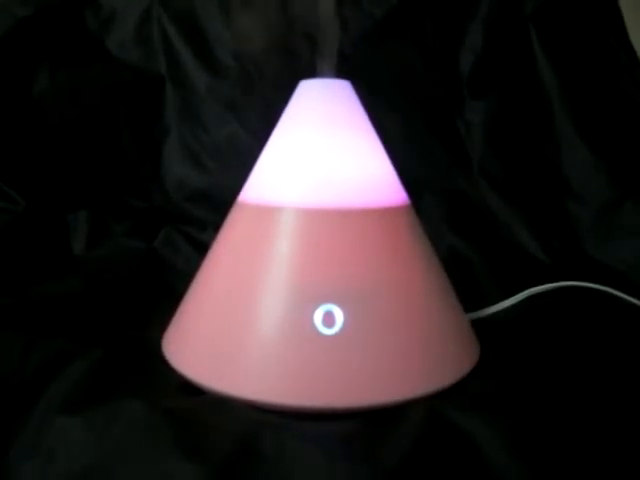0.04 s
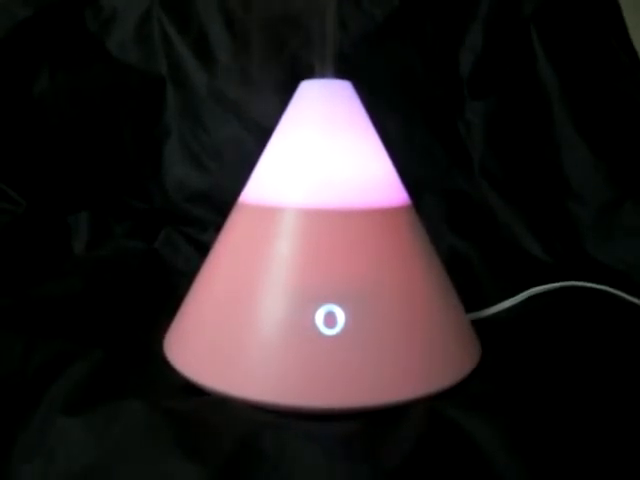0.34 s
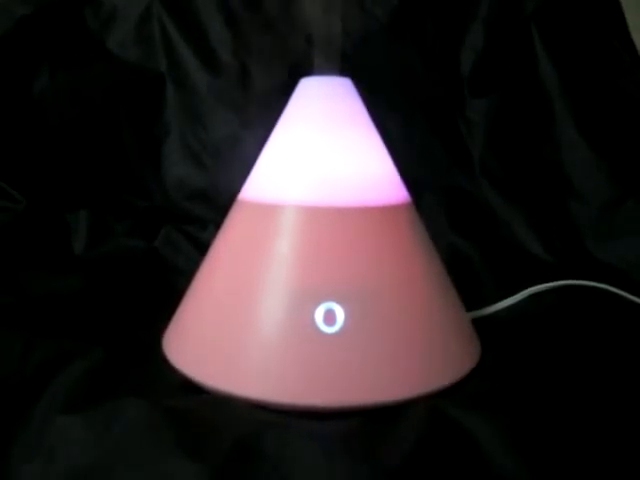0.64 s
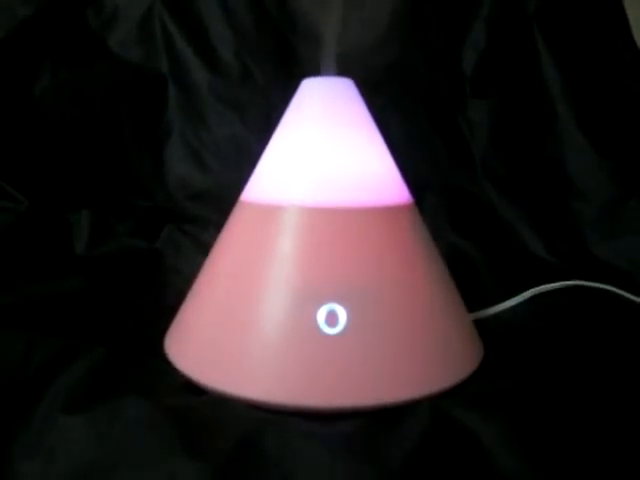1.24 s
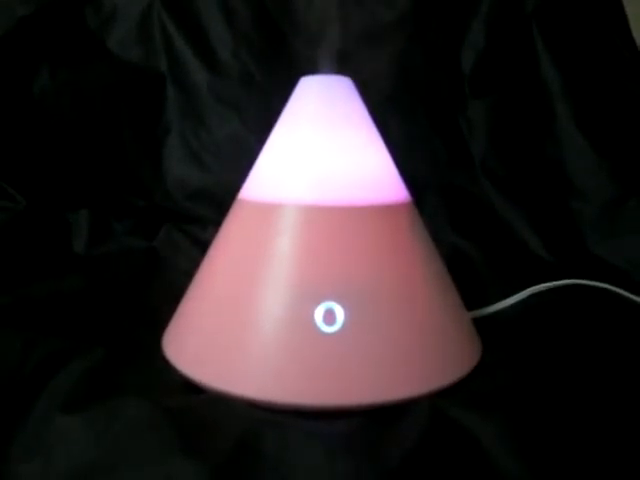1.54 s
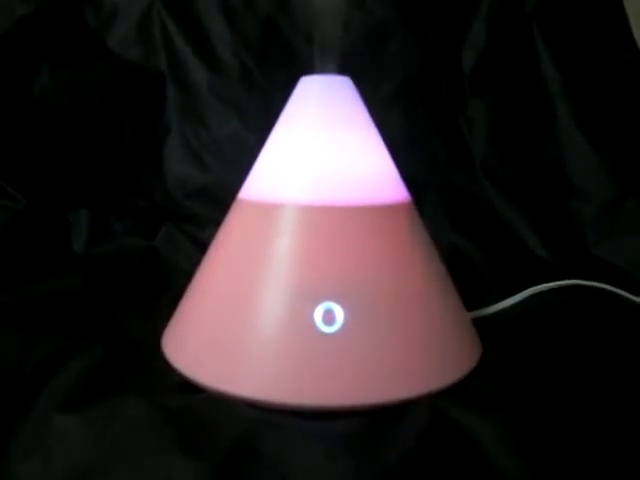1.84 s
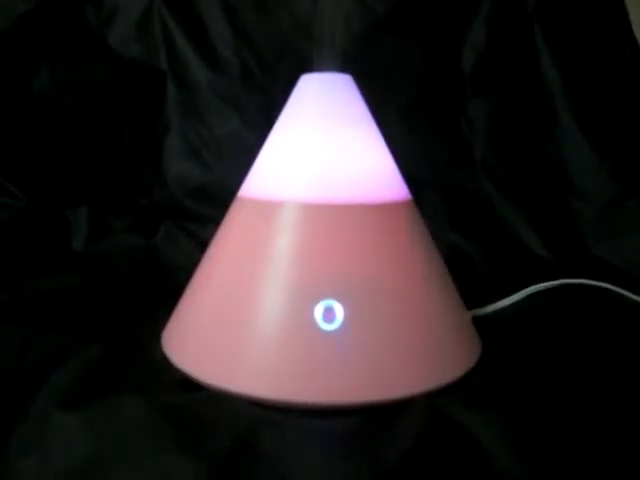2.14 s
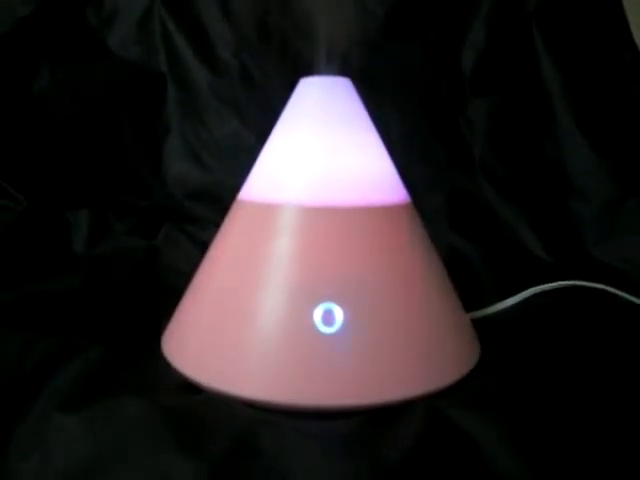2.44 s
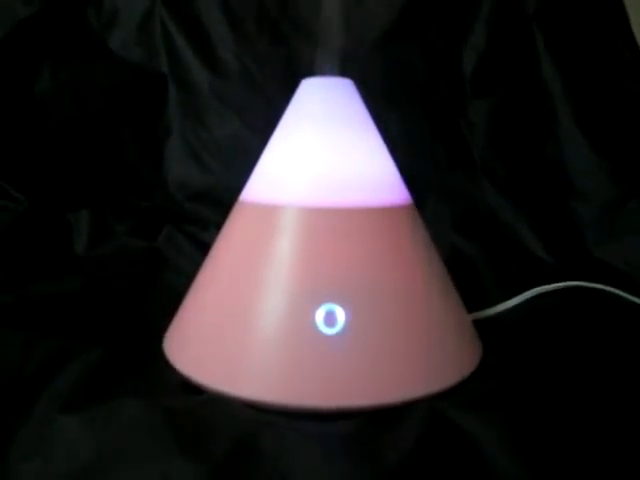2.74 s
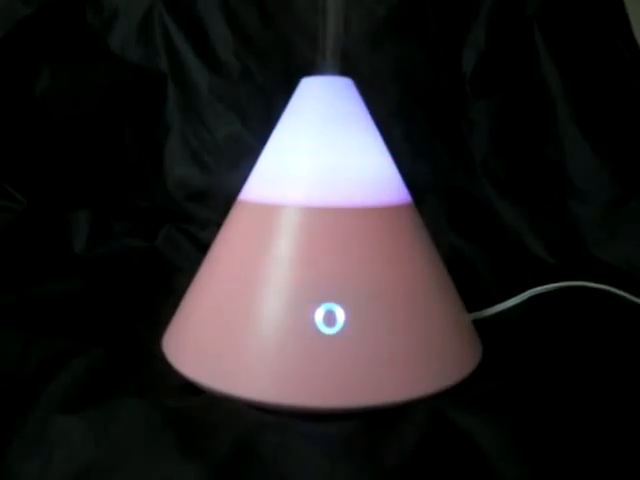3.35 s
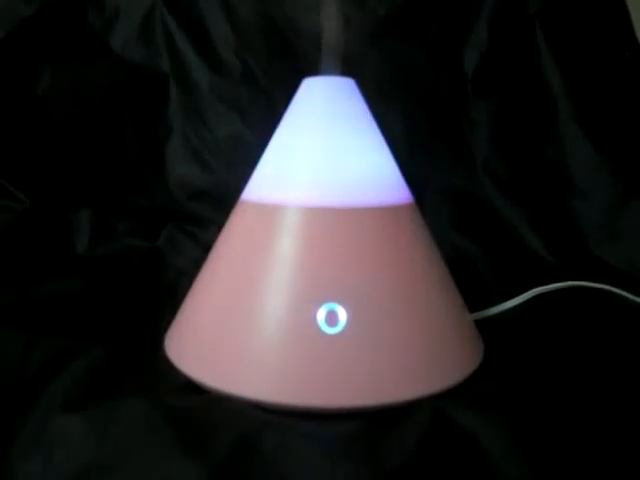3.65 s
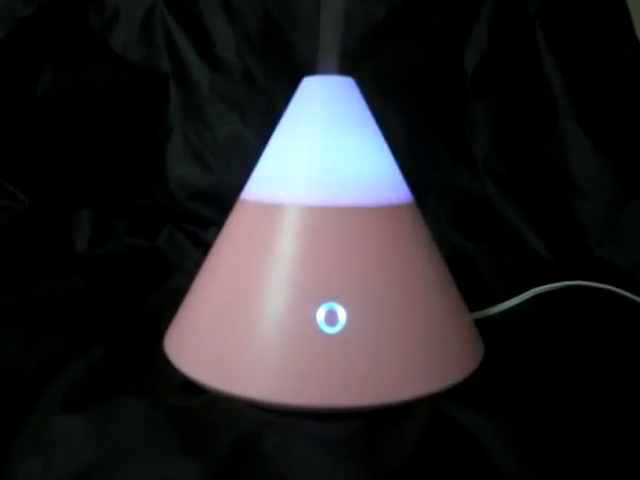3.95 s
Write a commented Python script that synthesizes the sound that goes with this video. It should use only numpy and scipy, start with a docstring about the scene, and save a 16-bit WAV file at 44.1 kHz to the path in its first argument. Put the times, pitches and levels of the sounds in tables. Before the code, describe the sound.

A muffled engine rumble, heard from inside a quiet room, wavers as a vehicle slowly nears outside. A faint high whistle frays into soft hiss, a tiny squeak follows, and tyre noise grows over a mist diffuser's slight hum.

```python
"""A vehicle's engine drones through the wall of a quiet room as it slowly draws near outside.
Periodic firing gives a low tone that fades in and out above a throb and a rumble; broadband
tyre noise swells and excites the window's resonances. Indoors, a mist diffuser's fan hums faintly.
At the start a thin high whistle sags and frays, and a soft hiss follows near the same pitch.
One faint squeak sounds about halfway through."""
import sys
import numpy as np
from scipy import signal
from scipy.fft import rfft, irfft
from scipy.io import wavfile

SR = 44100
rng = np.random.default_rng(int(sys.argv[2]) if len(sys.argv) > 2 else 0)


def bounce(signal):
    """Save signal as a 16-bit WAV file at the path given by the first command-line argument."""
    frames = np.transpose(np.atleast_2d(signal))
    limited = np.clip(frames, -1, 1)
    pcm = np.round(limited * 32767).astype(np.int16)
    wavfile.write(sys.argv[1], SR, pcm)


N = 176400


def from_db(db):
    """Amplitude ratio of a level: a factor of ten per 20 dB."""
    return 10 ** (np.asarray(db) / 20)


def rms_one(x):
    """Normalisation to unit mean power."""
    return x / np.sqrt(np.mean(x ** 2) + 1e-20)


def seconds():
    """Uniform sampling: the time of every sample."""
    return np.arange(N) / SR


def in_time(rows):
    """Linear interpolation between rows of t/s, value."""
    return np.interp(seconds(), *np.transpose(rows))


def drift(corner_hz):
    """Random modulation: noise through a two-pole low-pass, with a spread of about 1."""
    step, settling = 40, 2000  # samples per control point; points discarded as the filter settles
    pole = np.exp(-2 * np.pi * corner_hz * step / SR)
    white = rng.standard_normal(N // step + settling + 2)
    slow = signal.lfilter([1], [1, -2 * pole, pole * pole], white)[settling:]
    return np.interp(np.arange(N) / step, np.arange(len(slow)), rms_one(slow))


def coloured_noise(spectrum):
    """Spectral shaping: unit-power noise following rows of f/Hz, relative level/dB."""
    hz, db = np.transpose(spectrum)
    bin_hz = np.maximum(np.arange(N // 2 + 1) * SR / N, 1)
    gain = from_db(np.interp(np.log(bin_hz), np.log(hz), db))
    return rms_one(irfft(rfft(rng.standard_normal(N)) * gain, N))


def resonant_noise(hz, width_hz):
    """Random excitation of a resonance: band-pass noise of unit power."""
    edges_hz = [max(hz - width_hz / 2, 10), hz + width_hz / 2]
    band = signal.butter(2, edges_hz, "band", fs=SR, output="sos")
    return rms_one(signal.sosfilt(band, rng.standard_normal(N + SR))[SR:])


def tone(hz):
    """A unit-power sinusoid whose phase is the integral of its frequency."""
    cycles = np.cumsum(hz * np.ones(N)) / SR + rng.random()
    return np.sqrt(2) * np.sin(2 * np.pi * cycles)


def room_tone():
    """Stationary noise: room tone and microphone hiss set the noise floor."""
    # noise floor spectrum: f/Hz, relative level/dB
    spectrum = [(100, -3), (165, -6), (200, 2.5), (245, -3.5), (285, -1.5), (380, -4), (520, -10),
                (700, -12.5), (850, -19), (1100, -20), (1400, -14), (1800, -22.5), (2400, -21.5),
                (3300, -23), (4200, -23.5), (5600, -24), (7000, -26), (10300, -28.5), (12000, -25)]
    return from_db(-50) * coloured_noise(spectrum)


def diffuser():
    """Tonal fan noise: the partials waver together in pitch and independently in level."""
    # fan partials: f/Hz, mean level/dB
    partials = [(241, -62), (813, -71.5), (1899, -71.5)]
    waver_db = 2.0
    speed = 1 + 0.00397 * drift(corner_hz=14.8)
    return sum(from_db(db + waver_db * drift(corner_hz=1)) * tone(hz * speed) for hz, db in partials)


def squeak():
    """Narrow-band noise under a short Gaussian envelope is heard as a faint squeak."""
    peak_s, spread_s = 1.916, 0.031
    swell = np.exp(-.5 * ((seconds() - peak_s) / spread_s) ** 2)
    return from_db(-58) * swell * resonant_noise(2090, width_hz=46)


def whistle():
    """Random frequency and amplitude modulation roughen a sagging tone, which gives way to noise bands."""
    # envelope of the tone before flutter: t/s, level/dB
    tone_level = [(0, -68), (.025, -56), (.05, -78), (.12, -55), (.17, -52.5), (.25, -69), (.31, -72),
                  (.38, -66), (.45, -72), (.7, -93)]
    # envelope of the frayed band just below it: t/s, level/dB
    fray_level = [(0, -72), (.12, -62.5), (.27, -59), (.45, -65), (.7, -77), (1.2, -100)]
    # envelope of the wider hiss: t/s, level/dB
    hiss_level = [(0, -83), (.7, -68), (1.1, -62.5), (1.4, -62.5), (1.6, -60), (1.74, -65.5), (2.2, -67.5),
                  (2.7, -71), (3.2, -100)]
    start_hz, sag_hz, sag_s = 5900, 164, 0.11
    jitter_hz = 13.8 * drift(corner_hz=60)
    flutter_db = 3.5 * drift(corner_hz=87)
    pitch_hz = start_hz - sag_hz * (1 - np.exp(-seconds() / sag_s)) + jitter_hz
    clear = from_db(in_time(tone_level) + flutter_db) * tone(pitch_hz)
    frayed = from_db(in_time(fray_level)) * resonant_noise(5550, width_hz=260)
    hiss = from_db(in_time(hiss_level)) * resonant_noise(5360, width_hz=1600)
    return clear + frayed + hiss


def wall_reflections(direct, count=8):
    """Comb filtering: delayed reflections interfere with the direct sound and ripple its spectrum."""
    echo_db, earliest_s, latest_s = -17, .006, .045
    heard = direct.copy()
    for when, polarity in rng.random((count, 2)):
        lag = int(SR * (earliest_s + when * (latest_s - earliest_s)))
        heard[lag:] += np.sign(polarity - .5) * from_db(echo_db) * direct[:N - lag]
    return heard


def window():
    """Forced vibration: the window's resonances grow louder as the vehicle approaches."""
    # window resonances: f/Hz, bandwidth/Hz, level/dB at the nearest approach
    modes = [(259, 105, -58), (376, 76, -54), (975.7, 75, -57.5), (1379, 190, -52)]
    nearest_s, approach_db_per_s = 3.66, 10
    distance_db = -approach_db_per_s * np.maximum(nearest_s - seconds(), 0)
    return sum(from_db(db + distance_db) * resonant_noise(hz, width) for hz, width, db in modes)


def tyres():
    """Rolling noise: a swelling broadband rush with a hollow band from the tread."""
    # spectrum of the rush through the window: f/Hz, relative level/dB
    rush_spectrum = [(120, -16.5), (200, 3), (290, 6.5), (330, -5), (450, 2.5), (600, -1), (740, -2),
                     (830, 1), (980, 1.5), (1150, 0), (1400, -2.5), (1560, -3), (1700, -.5), (2050, -5),
                     (2280, -8), (2520, -8), (3000, -14.5), (4200, -19), (7000, -47)]
    # envelope of the direct rush: t/s, level/dB
    rush_level = [(0, -59), (.8, -56.5), (1.6, -54), (2.4, -50), (3.1, -48.5), (4, -45.5)]
    # envelope of the direct tread band: t/s, level/dB
    tread_level = [(0, -88), (1.2, -69), (1.7, -63), (1.9, -68), (2.1, -63), (3.1, -58.5), (4, -67)]
    tread = from_db(in_time(tread_level)) * resonant_noise(2042, width_hz=280)
    rush = from_db(in_time(rush_level)) * coloured_noise(rush_spectrum)
    return tread + rush


def engine():
    """Periodic excitation: firing gives partials at 1/2, 1 and 3/2 times its rate, over a noisy rumble."""
    # firing rate: t/s, f/Hz
    firing_rate = [(0, 94.3), (.6, 95.7), (1.0, 96.68), (1.6, 97.45), (2.1, 98.55), (3.1, 99), (4, 98.5)]
    # envelope of the drone in the room: t/s, level/dB
    drone_level = [(0, -48), (.05, -46), (.1, -37.5), (.16, -44), (.27, -36.5), (.42, -49), (.64, -51),
                   (.9, -34), (1.1, -35.5), (1.3, -39), (1.49, -36.5), (1.58, -40), (1.85, -39.5),
                   (2.3, -52.5), (2.39, -35.5), (2.52, -36.5), (2.61, -42.5), (2.78, -31.5), (2.9, -33.5),
                   (3.07, -40.5), (3.19, -32.5), (3.38, -44), (3.64, -59), (3.77, -37.5), (3.89, -39),
                   (4, -49)]
    # envelope of the subharmonic throb: t/s, level/dB
    throb_level = [(0, -49.5), (.33, -54), (.55, -40.5), (.75, -57), (.98, -40), (1.25, -56), (1.42, -62),
                   (1.6, -48.5), (2.15, -41), (2.42, -49), (2.67, -42.5), (2.84, -51), (2.97, -36.5),
                   (3.1, -50), (3.43, -38), (4, -44.5)]
    # envelope of the weak overtone: t/s, level/dB
    overtone_level = [(0, -72), (.85, -73), (1.15, -58), (1.75, -54), (2.0, -71), (2.7, -66), (3.05, -62),
                      (3.35, -58), (3.65, -56), (4, -54)]
    # spectrum of the rumble: f/Hz, relative level/dB
    rumble_spectrum = [(15, -17), (25, -13), (33, -1), (38, -3), (44, -1.5), (52, -7), (60, 5.5),
                       (75, -0.5), (95, -2), (110, -6), (123, 1), (138, -14), (180, -14), (300, -47)]
    # envelope of the rumble: t/s, level/dB
    rumble_level = [(0, -47.5), (1.2, -43.5), (1.7, -43), (2.1, -43), (2.45, -46), (2.8, -46.5),
                    (3.4, -43.5), (3.8, -50), (4, -41)]
    firing_hz = in_time(firing_rate)
    drone = from_db(in_time(drone_level)) * tone(firing_hz)
    throb = from_db(in_time(throb_level)) * tone(firing_hz / 2)
    overtone = from_db(in_time(overtone_level)) * tone(firing_hz * 1.5)
    rumble = from_db(in_time(rumble_level)) * coloured_noise(rumble_spectrum)
    return drone + throb + overtone + rumble


def scene():
    """Superposition: the sound pressures of all sources add in one channel."""
    vehicle = engine() + window() + wall_reflections(tyres())
    return (vehicle + diffuser() + whistle() + room_tone() + squeak())[None]


def record(dry):
    """Band limiting: a steep low-pass removes the highest treble."""
    stopband_hz, attenuation_db = 12000, 70
    low_pass = signal.cheby2(14, attenuation_db, stopband_hz, fs=SR, output="sos")
    return signal.sosfilt(low_pass, dry)


dry = scene()
out = record(dry)
bounce(out)
```